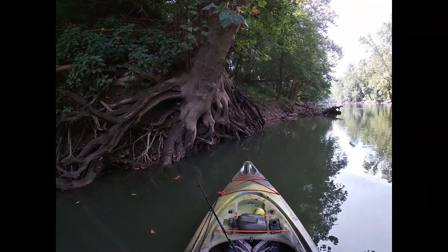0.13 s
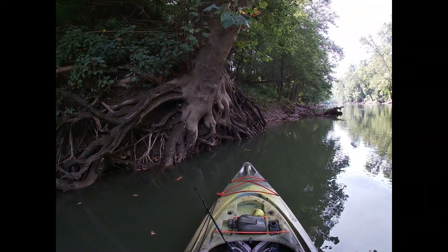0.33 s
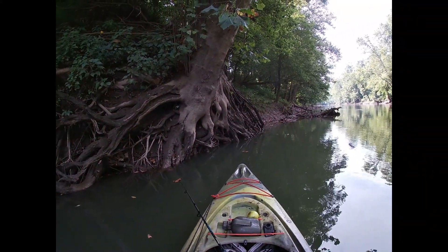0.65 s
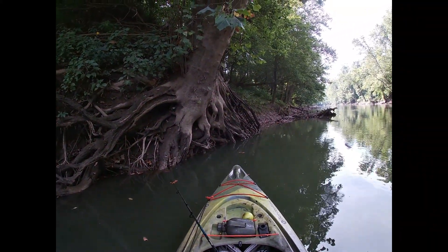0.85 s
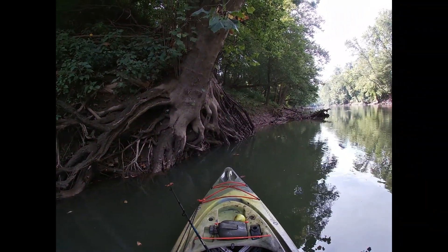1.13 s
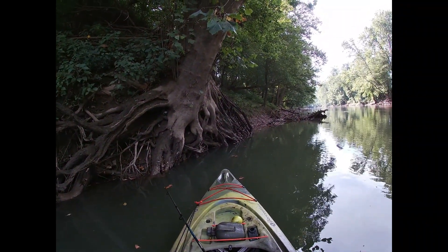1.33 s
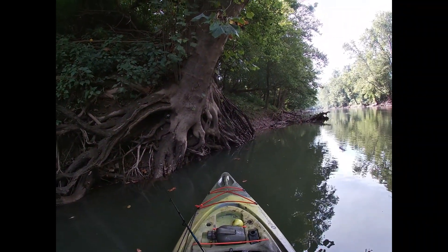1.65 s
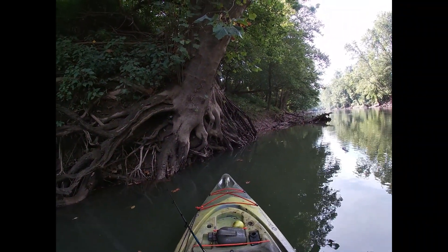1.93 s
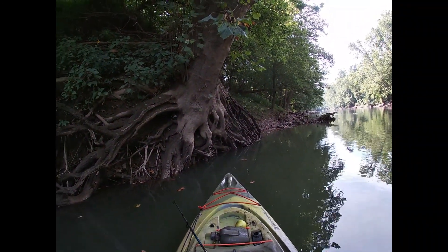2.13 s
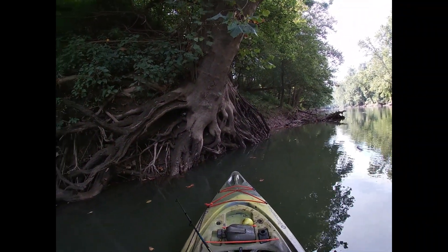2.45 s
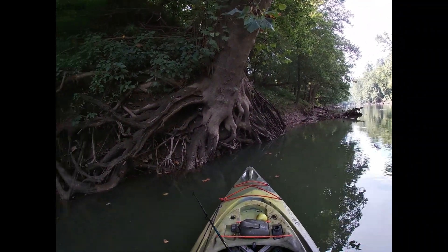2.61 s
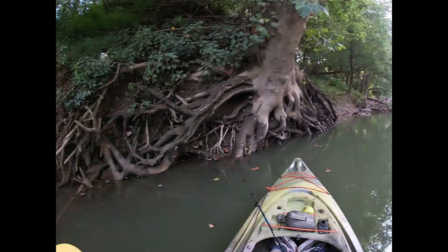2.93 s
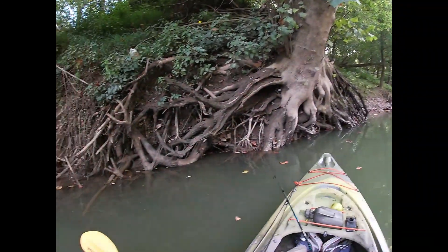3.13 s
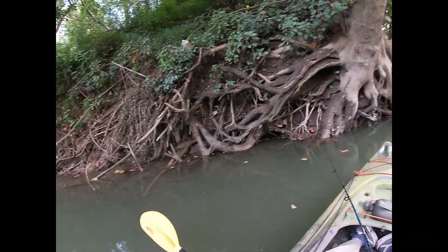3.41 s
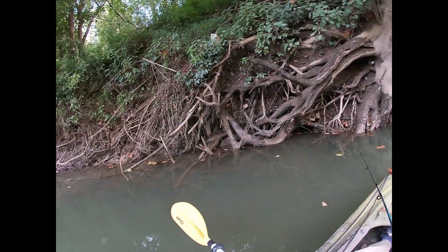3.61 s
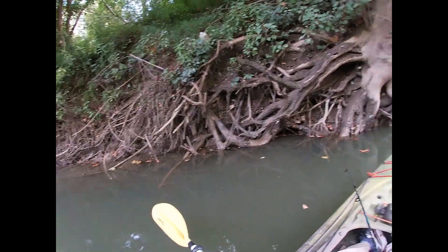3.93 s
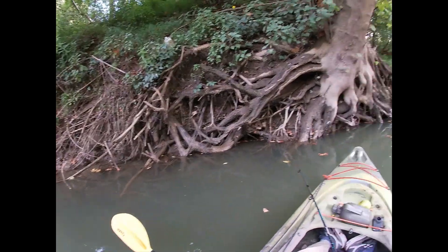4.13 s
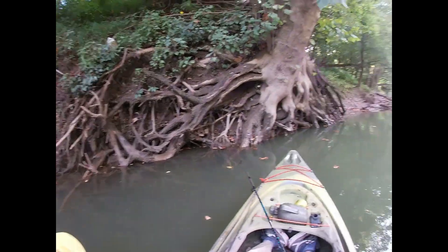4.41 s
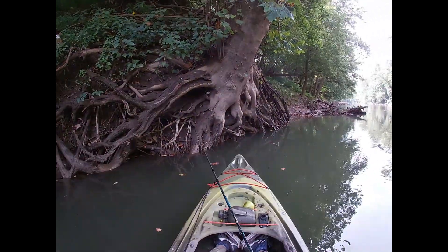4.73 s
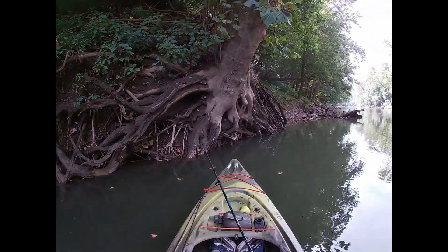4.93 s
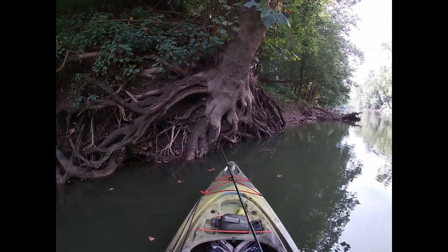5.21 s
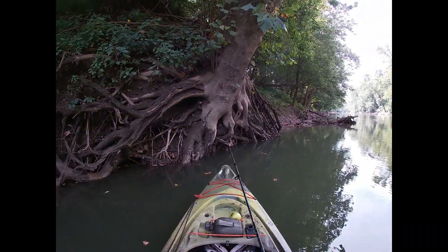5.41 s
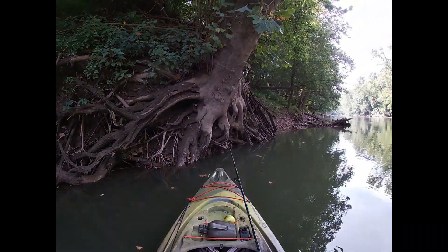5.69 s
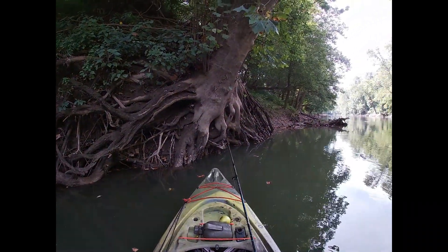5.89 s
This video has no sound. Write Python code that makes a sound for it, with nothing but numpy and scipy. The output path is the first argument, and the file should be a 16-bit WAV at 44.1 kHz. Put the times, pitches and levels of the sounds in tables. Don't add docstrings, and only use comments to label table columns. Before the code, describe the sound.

A continuous, high, shrill cicada drone dominates from 0 to 6 seconds, nearly level, with a wider, softer distant insect chorus that fades a little after 4.2. A thin rustle of leaves grows slightly between about 2.5 and 5 as the microphone turns to the bank, then eases. At 0.9, 2.6 and 4.3 a small bird gives a trill of about a dozen fast chirps, each trill lasting roughly 0.3 seconds, falling and slowing, with echoes in the trees; the second starts higher. Faint hoarse crow calls come from afar near 0.8, 1.7, 2.0, 3.5 and after 5.6. Little dry ticks of loose gear occur around 0.7, 1.35, 3.3, 3.7, 4.5 and 5.5, with a brighter tap at 5.2. Quiet water and low, irregular air puffs stir the hull underneath. A dull low knock just starts at 6.05. Mono outdoor sound with very faint hiss.

```python
import sys
import numpy as np
from scipy import signal
from scipy.fft import rfft, irfft
from scipy.io import wavfile
from scipy.ndimage import uniform_filter1d

SR = 44100
rng = np.random.default_rng(int(sys.argv[2]) if len(sys.argv) > 2 else 0)


def volts_from_decibels(level):
    exponent = np.asarray(level, float) / 20
    return 10 ** exponent


def to_wav(sig):
    pcm = np.clip(np.atleast_2d(sig), -1, 1) * 32767
    pcm = np.round(pcm).astype(np.int16)
    wavfile.write(sys.argv[1], SR, pcm.T)


N = 267246

# time_s, gain_towards_bank_db
HEAD_TURN = [
    (0, 0),
    (1.5, 0.3),
    (2.5, 2),
    (2.85, 3.5),
    (3.5, 3.5),
    (4.2, 4),
    (4.9, 4),
    (5.15, 2),
    (5.3, 1.5),
    (6.06, .4),
]
# time_s, level_db
WATER_SWELL = [(0, -68.5), (0.7, -66.5), (1.3, -67.5), (2.5, -67.5), (3.2, -65), (4.1, -66.5), (4.9, -63),
               (5.15, -66.5), (5.3, -63), (5.75, -66), (6.06, -60.5)]
CALM_DB = -71.5


def evened(x):
    return x / np.sqrt(np.mean(x ** 2) + 1e-20)


def steadied(x):
    return evened(x / np.sqrt(uniform_filter1d(x ** 2, size=3000) + .1))


def column(rows, index):
    rows = np.array(rows)
    return np.interp(np.arange(N) / SR, rows[:, 0], rows[:, index])


def add(mix, start_s, sound):
    part = mix[round(start_s * SR):][:len(sound)]
    part += sound[:len(part)]


def colour(x, spectrum):
    f, db = np.transpose(spectrum)
    hz = np.fft.rfftfreq(len(x), 1 / SR)
    gain = volts_from_decibels(np.interp(np.log(hz + 1), np.log(f + 1), db, left=-120, right=-120))
    return evened(irfft(rfft(x) * gain, len(x)))


def patchy(patchy_db, swell_db):
    frames = N // 128 + 5
    real, imaginary, patches = rng.standard_normal((frames, 257, 3)).T
    patches = uniform_filter1d(patches, size=5, axis=0)
    patches = evened(uniform_filter1d(patches, size=20, axis=1))
    swell = evened(uniform_filter1d(rng.standard_normal(frames), size=24))
    z = (real + 1j * imaginary) * volts_from_decibels(patchy_db * patches + swell_db * swell)
    return signal.istft(z, nperseg=512, noverlap=384)[1][:N]


def woods(x, t60, wet_db, turns_hz, size):
    out, t = np.zeros(N), np.arange(22 * size + 150) / SR
    for k in range(3):
        taps = np.zeros(len(t))
        arrivals = 150 + 22 * np.arange(size) + rng.integers(0, 22, size)
        taps[arrivals] = rng.choice([-1., 1.], size)
        taps *= volts_from_decibels(-60 * t / t60)
        turn = np.cos(2 * np.pi * turns_hz * np.arange(N) / SR + k * np.pi / 3) * np.sqrt(2 / 3)
        out += volts_from_decibels(wet_db) * signal.fftconvolve(x * turn, taps / np.linalg.norm(taps))[:N]
    return out


def tymbal_clicks(count, low_hz, high_hz, jitter, spread_db):
    out = np.zeros(N)
    wander = evened(uniform_filter1d(rng.standard_normal(N), size=300))
    for share, far, lag in rng.random((count, 3)):
        rate_hz = (low_hz + share * (high_hz - low_hz)) * (1 + jitter * np.roll(wander, int(lag * N)))
        clicks = np.diff(np.floor(np.cumsum(rate_hz) / SR + far), prepend=0) > 0
        out += volts_from_decibels(-spread_db * far) * clicks
    return out * (1 + 0.18 * rng.standard_normal(N))


def near_cicadas():
    # time_s, level_db
    drone = [(0.0, -38.5), (0.3, -37.5), (1.3, -38), (2.0, -38), (3.2, -37), (3.5, -37.5), (4.4, -37),
             (4.9, -37.5), (6.06, -37.5)]
    # pitch_hz, density_db
    tymbal = [(4600, -50), (5300, -43), (5900, -18.5), (6250, -5), (6500, -2), (6800, -0.5), (7050, -4.5),
              (7300, -7), (7550, -14), (7950, -15.5), (8250, -23.5), (8550, -36), (9000, -58)]
    clicks = tymbal_clicks(count=24, low_hz=110.05, high_hz=330.2, jitter=.12, spread_db=8.5)
    source = evened(clicks) + 0.62 * evened(patchy(0.61, 0.26))
    return volts_from_decibels(column(drone, index=1)) * colour(source, tymbal)


def far_cicadas(turn_db):
    # pitch_hz, density_db
    far_body = [(1060, -46), (1800, -34), (2200, -20.5), (2480, -11.5), (2670, -11.5), (2750, -10),
                (3280, -5), (5240, -5.5), (6000, 0), (7800, -21.5), (13200, -120)]
    tired_s = np.maximum(np.arange(N) / SR - 4.18, 0)
    level_db = -49.5 + 0.73 * turn_db - 1.7 * tired_s
    return volts_from_decibels(level_db) * colour(patchy(0.9, 0.13), far_body)


def rustling_leaves(turn_db):
    # pitch_hz, density_db
    rustle = [(8000, -15), (8500, 0), (9100, -1), (10000, -6), (10700, 0), (11500, -9), (12000, -10),
              (12500, -12), (13200, -12), (14000, -16), (14600, -13), (15150, -18), (15250, -26),
              (15800, -28)]
    return volts_from_decibels(-69.5 + turn_db) * colour(patchy(0.62, 0.53), rustle)


def hull_hum(thrum_db, water_db):
    # pitch_hz, density_db
    hollow = [(70, -28), (85, -12), (110, -6.5), (150, -4), (175, 1.5), (200, -3.5), (230, -7), (330, -17),
              (480, -25), (620, -45)]
    level_db = -57.5 + 0.055 * (thrum_db - CALM_DB) + 0.24 * (water_db - water_db.mean())
    return volts_from_decibels(level_db) * colour(patchy(0.99, 0.61), hollow)


def water_wash(water_db):
    # pitch_hz, density_db
    wash = [(240, -27), (400, -10), (581, -5), (767, 1), (991, -5), (1830, -6), (2300, -7.5), (2990, -38),
            (5060, -120)]
    return volts_from_decibels(water_db) * colour(patchy(1.6, 0.21), wash)


def gusts(index):
    # middle_s, half_length_s, breeze_db, thrum_db
    puffs = [(0.04, .08, -72, -62), (0.183, 0.07, -61, -59), (0.448, 0.12, -80, -63),
             (0.652, .15, -61, -62), (0.8, 0.075, -66, -51), (1.04, .07, -62, -59), (1.212, 0.15, -61, -59),
             (1.356, 0.037, -56, -46), (1.536, 0.1, -51, -55.5), (1.774, .07, -58, -57.5),
             (1.876, 0.16, -66, -55.5), (2.28, .13, -55, -56.5), (2.55, 0.089, -61, -51),
             (2.8, .25, -66, -62), (3.2, 0.068, -70, -59), (3.538, 0.11, -55, -59),
             (3.738, 0.13, -63, -52.5), (4.105, .13, -51, -54), (4.22, .12, -55, -56),
             (4.358, 0.18, -43.5, -71), (4.5, 0.17, -54, -55), (5.18, 0.14, -61, -74),
             (5.313, 0.1, -80, -54), (5.7, .15, -75, -74), (5.87, .1, -64, -59), (6.04, .15, -60, -60)]
    t = np.arange(N) / SR
    levels_db = []
    for row in puffs:
        swell = np.clip(1 - abs(t - row[0]) / (1.19 * row[1]), 0, 1)
        levels_db.append(CALM_DB + (row[index] - CALM_DB) * swell)
    return np.max(levels_db, axis=0)


def breeze():
    # pitch_hz, density_db
    buffeting = [(7.1, -32), (12, 4), (44, -13), (57, -48), (97, -120)]
    return volts_from_decibels(gusts(index=2)) * steadied(colour(rng.standard_normal(N), buffeting))


def hull_thrum(thrum_db):
    # pitch_hz, density_db
    shaken = [(26, -48), (44, 2.5), (63, 6.5), (85, -10.5), (110, -16), (190, -120)]
    return volts_from_decibels(thrum_db) * steadied(colour(rng.standard_normal(N), shaken))


def boat():
    # start_s, peak_db, low_ring_hz, high_ring_hz, high_ring_db
    ticks = [(.665, -45.5, 800, 1240, -3), (.905, -60, 1610, 1940, 15), (1.344, -52.5, 1650, 2270, 6),
             (1.398, -53, 1510, 2100, 0), (2.517, -63, 1700, 2180, 0), (3.318, -55, 1250, 2060, 11.5),
             (3.709, -52, 1900, 2350, 8), (4.512, -52, 1680, 2100, -3), (4.645, -66, 1200, 1990, 2),
             (5.103, -53, 1685, 2100, -6), (5.472, -52, 1570, 2090, 2), (5.55, -61, 1500, 1800, 0)]
    # start_s, peak_db, low_ring_hz, high_ring_hz, high_ring_db
    loose_taps = [
        (.781, -60, 720, 2310, -12),
        (1.037, -57, 714, 1400, -14),
        (3.71, -61, 770, 2000, -12),
        (5.2, -48.5, 1690, 2300, 3.5),
        (5.201, -54, 616, 2650, 2),
    ]
    out, t = np.zeros(N), np.arange(2000) / SR
    snap = 1.1 * (1 - t / 0.00006) * np.exp(-t / 0.00011)
    for rows, t60 in ((ticks, 0.015), (loose_taps, 0.04)):
        for start_s, db, low_hz, high_hz, high_db in rows:
            rings = np.sin(2 * np.pi * low_hz * t) + volts_from_decibels(high_db) * np.sin(2 * np.pi * high_hz * t)
            rings *= volts_from_decibels(-60 * t / t60) * np.minimum(t / 0.00071, 1)
            add(out, start_s, volts_from_decibels(db + 2.5) * (rings + snap))
    out = signal.lfilter(*signal.butter(2, 2800, fs=SR), out)
    knock = np.sin(2 * np.pi * 215 * t) * np.minimum(t / .008, 1.1) ** 1.8
    add(out, 6.0515, volts_from_decibels(-30) * knock)
    return out


def crow():
    # start_s, length_s, level_db, top_pitch_hz, gape_at_top_db
    calls = [(.82, .147, -66, 736, 8), (1.695, .15, -63, 703, 0), (1.685, .055, -66, 803, 0),
             (1.96, .07, -66, 812, 0), (3.506, .21, -63, 736, 10), (5.655, .04, -64, 768, 0),
             (5.895, .045, -64, 780, 1), (5.945, .115, -69, 742, 10), (5.972, .028, -61, 750, 0),
             (6.002, .02, -65, 785, 0), (6.027, .028, -62, 768, 0)]
    top_s, break_s, break_hz = .065, .147, 28
    out = np.zeros(N)
    for start_s, length_s, db, top_hz, gape_db in calls:
        t = np.arange(0, length_s, 1 / SR)
        bend_hz = np.where(t < top_s, 12000, 7500) * (t - top_s) ** 2
        hz = top_hz - bend_hz + break_hz * (t > break_s)
        gape = gape_db * np.exp(-((t - top_s) / .03) ** 4)
        waver, flutter = uniform_filter1d(rng.standard_normal((2, len(t))), size=300)
        turns = np.cumsum(hz * (1 + .004 * evened(waver))) / SR
        lower = np.sin(4 * np.pi * turns) + .25 * np.sin(2 * np.pi * turns)
        voice = volts_from_decibels(-gape) * np.sin(6 * np.pi * turns) + volts_from_decibels(-15 + 1.15 * gape) * lower
        level = volts_from_decibels(db + 2.0 * evened(flutter))
        add(out, start_s, np.sqrt(2) * level * voice * signal.windows.tukey(len(t), .2))
    return out + woods(out, t60=.5, wet_db=-9, turns_hz=3.1, size=800)


def chirp(out_db, hz, rise_hz, length_s):
    u = np.linspace(-.5, .75, round(1.25 * length_s * SR))
    turns = np.cumsum(hz + rise_hz * (u + .6 * u ** 2)) / SR
    body = np.cos(np.pi * np.clip(u, -.5, .5)) ** 1.3
    flick = 0.23 * np.exp(-((u - .5) / 0.29) ** 2)
    return volts_from_decibels(out_db) * (body + flick) * np.sin(2 * np.pi * turns)


def wren():
    # note_middle_s, peak_db, middle_hz
    trill = [(.005, -5.5, 3300), (.017, -5, 3480), (.033, -5, 3430), (.05, -2.5, 3350), (.071, -1, 3373),
             (.093, -0.5, 3295), (.12, 0.5, 3190), (.145, -3, 3120), (.175, -3, 2940), (.2, -1, 2950),
             (.234, -5, 2826), (.258, -4, 2752), (.284, -5, 2730)]
    # start_s, level_db, pitch_shift_hz, straight_path_db, opening_tick_db
    songs = [
        (.882, -32, -76, -1, -40),
        (2.629, -34, 115, -2.5, -40),
        (4.305, -34, -12, -1, -92),
    ]
    note_counts = [12, 13, 13]
    opener_s, opener_length_s = -.0215, .012
    settle_s, lowest_hz = 0.181, 2750
    out, straight = np.zeros(N), np.zeros(N)
    gaps_s = np.gradient(np.array(trill)[:, 0])
    for (start_s, song_db, shift_hz, straight_db, opener_db), count in zip(songs, note_counts):
        song = np.zeros(N)
        opener = chirp(opener_db - straight_db, 4760, 680, opener_length_s)
        add(song, start_s + opener_s - opener_length_s / 2, opener)
        for (s, db, hz), gap_s in zip(trill[:count], gaps_s):
            hz = max(hz + shift_hz * (1 - s / settle_s), lowest_hz)
            length_s = .8 * gap_s * min(0.39 + s / .2, 1)
            rise_hz = 770 - 1200 * s
            add(song, start_s + s - length_s / 2, chirp(song_db + db, hz, rise_hz, length_s))
        out += song
        straight += volts_from_decibels(straight_db) * song
    near_echo = woods(out, t60=.22, wet_db=-6, turns_hz=9.0, size=400)
    dull = signal.lfilter(*signal.butter(4, 3250, fs=SR), out)
    return straight + near_echo + woods(dull, t60=1.1, wet_db=-4.0, turns_hz=2.5, size=1800)


def scene():
    turn_db, water_db = column(HEAD_TURN, index=1), column(WATER_SWELL, index=1)
    thrum_db = gusts(index=3)
    mono = near_cicadas() + far_cicadas(turn_db) + rustling_leaves(turn_db)
    mono += hull_hum(thrum_db, water_db) + water_wash(water_db)
    mono += breeze() + hull_thrum(thrum_db)
    mono += boat() + crow() + wren()
    return np.array([mono, mono])


def faint_high_hiss():
    # pitch_hz, density_db
    hiss_bands = [(11700, -36), (11950, -12), (12300, -5), (13200, -12), (13900, -5), (14400, -14),
                  (14700, -27)]
    level_db = -84 + 1.1 * column(HEAD_TURN, index=1)
    return volts_from_decibels(level_db) * colour(rng.standard_normal(N), hiss_bands)


def roll_off(x):
    return signal.sosfilt(signal.butter(12, 15720, fs=SR, output="sos"), x)


def record(dry):
    hiss = faint_high_hiss()
    return roll_off(dry + np.array([hiss, -hiss]))


dry = scene()
out = record(dry)
to_wav(out)
```